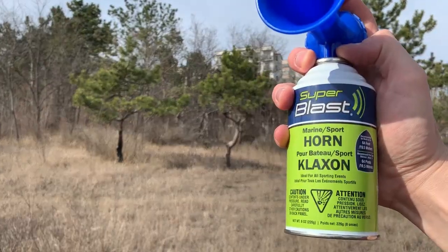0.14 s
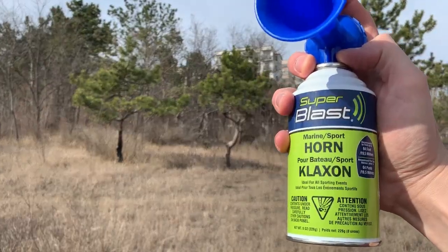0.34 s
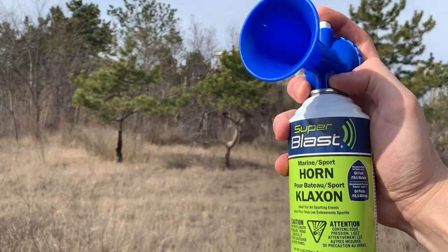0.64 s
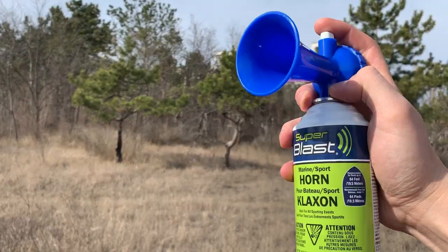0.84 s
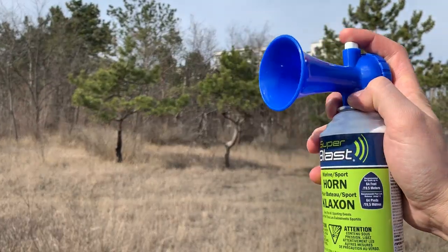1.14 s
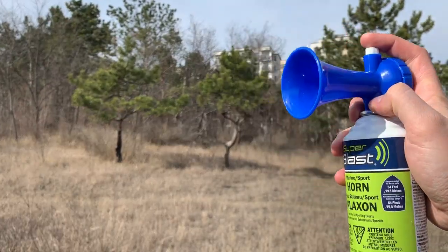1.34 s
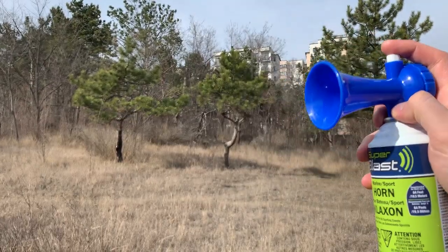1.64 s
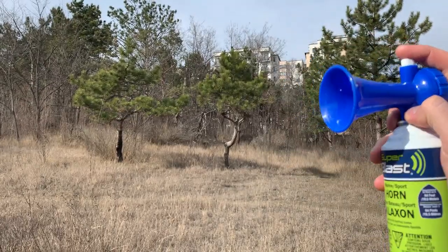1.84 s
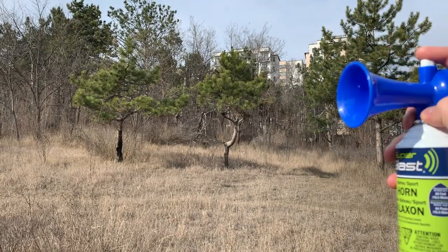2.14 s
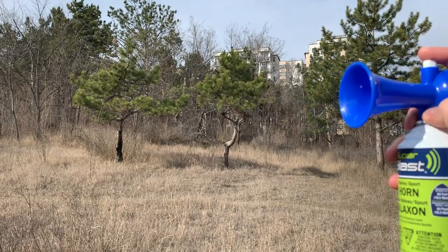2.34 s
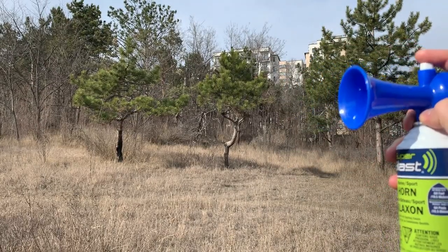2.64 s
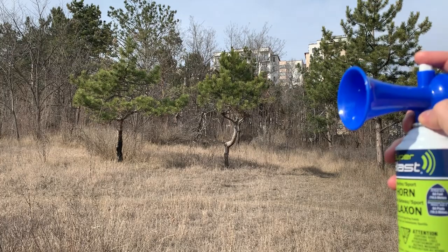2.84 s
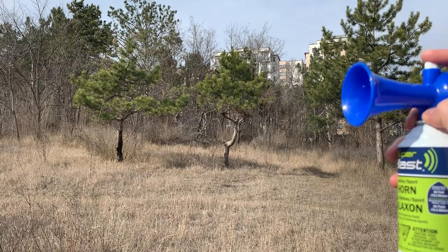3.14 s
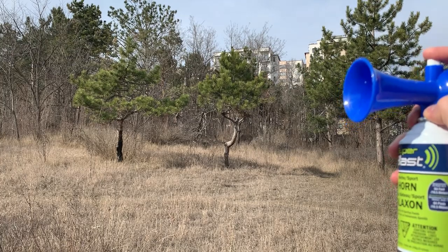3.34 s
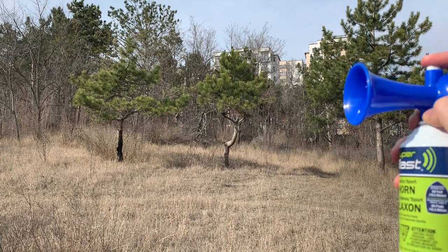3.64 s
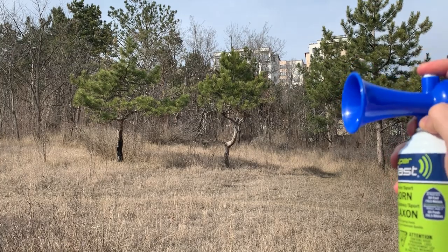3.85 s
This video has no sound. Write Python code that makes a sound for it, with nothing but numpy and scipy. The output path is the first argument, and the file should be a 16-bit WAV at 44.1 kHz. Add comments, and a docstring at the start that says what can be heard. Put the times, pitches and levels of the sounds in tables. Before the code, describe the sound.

Air horn blast, slightly right of the microphone, cut off just after it begins; first a long near-silence outdoors with low town rumble, two faint dog barks and soft air bumps.

```python
"""A hand-held gas horn is set off in a field at the edge of a town.
First far traffic (banded noise) and a wavering engine drone (narrow noise); a distant dog barks twice
(arched harmonics plus rasp) while faint rustles pass and air bumps the microphone (noise bursts).
Near 3.77 s the valve opens with a hiss (noise); the diaphragm (a harmonic sum) starts high and pure,
turns brassy and sinks to its steady note, with faint echoes."""
import sys
import numpy as np
from scipy import signal
from scipy.fft import rfft, irfft
from scipy.io import wavfile

SR = 44100
rng = np.random.default_rng(int(sys.argv[2]) if len(sys.argv) > 2 else 0)


def materialize(psi):
    """Save the field psi as 16-bit PCM at rate SR to the path in sys.argv[1].

    A 1-D psi becomes a single channel; in a 2-D psi each row is a channel.
    """
    bounded = np.clip(np.atleast_2d(psi).T, -1, 1)
    quanta = np.round(bounded * 32767).astype(np.int16)
    wavfile.write(sys.argv[1], SR, quanta)


N = 176400
T = np.arange(N) / SR
OPPOSITE = np.array([[1], [-1]])   # signs of a side signal: left, right


def from_db(db):
    """Amplitude ratio of a level in dB."""
    return 10 ** (np.asarray(db) / 20)


def rms_one(x):
    """Scale to rms 1."""
    return x / np.sqrt(np.mean(x ** 2) + 1e-20)


def along(rows, at):
    """Straight lines between the rows of a table."""
    return np.interp(at, *np.transpose(rows))


def at_hz(points, hz):
    """A spectrum read on a log-frequency axis."""
    f, value = np.transpose(points)
    return np.interp(np.log(np.maximum(hz, 1)), np.log(f), value)


def drift(rate_hz):
    """Noise through a two-pole low-pass, rms 1, computed every 40 samples and interpolated."""
    step, settle = 40, 2000   # samples per point; points discarded
    r = np.exp(-2 * np.pi * rate_hz * step / SR)
    white = rng.standard_normal(N // step + settle + 2)
    slow = rms_one(signal.lfilter([1], [1, -2 * r, r * r], white)[settle:])
    return np.interp(np.arange(N) / step, np.arange(len(slow)), slow)


def coloured(spectrum):
    """One channel of noise with the given colour above 20 Hz; rms 1."""
    hz = np.arange(N // 2 + 1) * SR / N
    gain = from_db(at_hz(spectrum, hz)) * (hz > 20)
    return rms_one(irfft(rfft(rng.standard_normal(N)) * gain, N))


def wide(spectrum, width):
    """Stereo noise: a shared part and a part that is opposite on the two sides."""
    return coloured(spectrum) + width * coloured(spectrum) * OPPOSITE


def bump(centre_s, width_s, db):
    """A Gaussian rise and fall."""
    return from_db(db) * np.exp(-.5 * ((T - centre_s) / width_s) ** 2)


def grow(half_s, rise_s):
    """Exponential growth that saturates at 1 and is half way at half_s."""
    return .5 + .5 * np.tanh((T - half_s) / (2 * rise_s))


def banded_noise(spectrum, patchy_db):
    """Half-octave bands of stereo noise, each with its own level, flicker and likeness; rms 1."""
    # left-right correlation: (frequency [Hz], likeness [-1 to 1])
    likeness = [(30, .5), (70, 0.6), (130, 0.69), (290, 0.57), (450, -0.18), (640, -0.43), (1050, -0.74),
                (1500, -0.43), (2400, .1), (8000, 0.1)]
    out, together = 0, drift(2)
    edges_hz = 22 * 2 ** np.arange(0, 9.6, .5)
    white = rng.standard_normal((2, 2, N))   # neighbouring bands take different noise
    for k, (low, high) in enumerate(zip(edges_hz, edges_hz[1:])):
        band = signal.butter(2, [low, high], "band", fs=SR, output="sos")
        mid, side = signal.sosfilt(np.vstack([band, band]), white[k % 2])
        hz = np.sqrt(low * high)
        alike = np.clip(at_hz(likeness, hz), -1, 1)
        flicker_db = patchy_db * (.5 * together + drift(6.6))
        stereo = np.sqrt(1 + alike) * mid + np.sqrt(1 - alike) * side * OPPOSITE
        out = out + from_db(at_hz(spectrum, hz) + flicker_db) * stereo
    return rms_one(out)


def town():
    """A wash of far traffic, and an engine drone: a carrier modulated by slow noise in quadrature."""
    # traffic colour: (frequency [Hz], level [dB per Hz])
    air = [(20, -33), (32, -17), (49, -2.5), (70, -2.5), (150, -13.5), (210, -15), (290, -15.5), (513, -22),
           (800, -24.5), (1370, -34), (1900, -50.5), (2800, -58.5), (5200, -56.5), (8500, -63),
           (11000, -59), (16000, -64)]
    # the far engine swells and fades: (time [s], level [dB])
    drone_level = [(0, -62), (.45, -60.5), (.85, -64), (1.05, -57), (1.3, -57), (1.6, -64), (2.3, -61),
                   (2.75, -61.5), (3.2, -74), (3.7, -62)]
    air_db, drone_hz, drone_width_hz = -59.5, 66.2, 5.2
    turn = 2 * np.pi * drone_hz * T

    def waver():
        return drift(drone_width_hz) * np.cos(turn) + drift(drone_width_hz) * np.sin(turn)

    drone = from_db(along(drone_level, T)) * (waver() + 0.42 * waver() * OPPOSITE)
    return drone + from_db(air_db) * banded_noise(air, patchy_db=0.95)


def dog():
    """Each bark arches in pitch and level, and scatters back from the trees as decaying noise."""
    # barks: (start [s], length [s], top pitch [Hz], place of the top [0-1 of length], level [dB])
    barks = [(0.258, 0.136, 383, 0.63, -64), (1.97, .13, 359, .74, -66.5)]
    # voice: (harmonic [number], level [dB])
    bark_harmonics = [(1, -17), (2, 2), (3, -20), (4, -10), (5, -29), (6, -37)]
    # rasp colour: (frequency [Hz], level [dB per Hz])
    bark_rasp = [(300, -20), (700, 3), (950, -13), (1350, 2), (1800, -12), (2400, -25), (5000, -60)]
    bend, rough, rasp_db = .6, .02, -15.5   # pitch arch, pitch wobble, rasp level
    trees_t60_s, trees_db = 0.42, -6
    out, rasp = np.zeros(N), from_db(rasp_db) * coloured(bark_rasp)
    for start_s, length_s, top_hz, top_at, db in barks:
        part = np.clip((T - start_s) / length_s, 0, 1)
        pitch_hz = top_hz * (1 - bend * (part - top_at) ** 2) * (1 + rough * drift(100))
        phase = 2 * np.pi * np.cumsum(pitch_hz) / SR
        voice = sum(from_db(level) * np.sin(k * phase) for k, level in bark_harmonics)
        out += from_db(db) * np.abs(np.sin(np.pi * part)) ** 1.14 * (voice + rasp)
    scatter = rng.standard_normal((2, SR)) * from_db(-60 * T[:SR] / trees_t60_s)
    scatter /= np.sqrt(np.sum(scatter ** 2, axis=1, keepdims=True))   # unit energy per side
    return out + from_db(trees_db) * signal.fftconvolve(out[None], scatter, axes=1)[:, :N]


def breeze():
    """Faint rustles and soft low bumps of air on the microphone: noise under Gaussian envelopes."""
    # rustles: (centre [s], width [s], level [dB])
    rustles = [(1.5, 0.23, -91), (2.599, 0.13, -90.5)]
    # rustle colour: (frequency [Hz], level [dB per Hz])
    rustle = [(800, -22), (1600, 1), (2300, -3), (3300, -12), (6000, -28), (16000, -50)]
    # air bumps: (centre [s], width [s], level [dB])
    puffs = [(1.85, 0.042, -55.5), (1.96, 0.013, -47.5), (2.251, 0.024, -52.5), (2.9, 0.053, -59.5),
             (3.55, 0.05, -52), (3.594, 0.0046, -47.5), (3.74, 0.022, -52)]
    # bump colour: (frequency [Hz], level [dB per Hz])
    puff = [(20, -16), (40, 1), (65, 2.5), (100, 2), (170, -23.5), (500, -40), (2000, -61), (8000, -100)]
    rustling = sum(bump(*row) for row in rustles) * wide(rustle, .6)
    return rustling + sum(bump(*row) for row in puffs) * wide(puff, 0.26)


def horn():
    """The diaphragm swings up, gains overtones as it starts to slap its seat, and chops the hissing gas."""
    # spurt colour: (frequency [Hz], level [dB per Hz])
    spurt_colour = [(300, -31), (1000, -8), (2400, 0), (4500, -14), (7000, 3), (9000, -3), (11700, 12),
                    (13500, 6), (16000, -1)]
    # bright jet of gas: (time [s], level [dB])
    hiss_level = [(3.771, -34), (3.776, -37), (3.781, -24), (3.8, -27.5), (3.81, -28), (3.84, -40),
                  (3.88, -39.5), (3.935, -45.5), (3.965, -49), (4.0, -56)]
    # jet colour: (frequency [Hz], level [dB per Hz])
    hiss_colour = [(500, -18.5), (2000, -1.5), (4000, -27), (5800, -16), (7200, 2), (8500, -1),
                   (10000, 2.5), (12000, 2), (14000, 6), (15500, 2)]
    # low noise bursts under the tone's onset: (time [s], level [dB])
    low_burst_level = [(3.771, -49.5), (3.785, -36), (3.812, -27.5), (3.835, -39.5), (3.855, -52.5),
                       (3.875, -44), (3.895, -59), (4.0, -57)]
    # low burst colour: (frequency [Hz], level [dB per Hz])
    low_burst_colour = [(40, -6), (130, -2.5), (350, -4), (800, 1.5), (1400, -2.5), (1850, -6.5),
                        (2400, 4.5), (3300, -7), (4500, -10.5), (6000, -33), (10000, -25)]
    # loudness of the whole tone: (time [s], level [dB])
    blast = [(3.79, 0), (3.805, 0), (3.815, 1.2), (3.83, .3), (3.833, -1.8), (3.872, .3), (3.875, -1.6),
             (3.895, -1.2), (3.915, .3), (4.0, -.3)]
    # base level of the tone's partials: (harmonic [number], peak level [dB])
    harmonics = [(1, -17), (2, -14), (3, -22), (4, -27.5), (5, -33.5), (6, -41.5), (7, -43.5), (8, -46.5),
                 (9, -48.5), (10, -50.5), (11, -48.5), (12, -47.5), (13, -43), (14, -50), (15, -47.5),
                 (16, -51.5), (17, -52), (18, -45.5), (19, -58), (20, -50), (21, -52), (22, -64), (23, -56)]
    # the fundamental starts strong and settles: (time [s], boost [dB])
    fundamental = [(3.8, 13.3), (3.812, 10.8), (3.835, 5.5), (3.872, 4.8), (3.9, 1.5), (3.96, .3)]
    # extra brightness of the first slaps: (frequency [Hz], boost [dB])
    flare_boost = [(1400, 1.5), (2200, 6), (3000, 0.5), (3700, 6), (4400, 15), (5200, 4), (6000, -1.5),
                   (7300, 18), (8500, -0.5), (10000, 0.5), (16000, -7)]
    valve_s, valve_open_s = 3.7685, 0.0039   # start and length of the opening
    spurt_s, spurt_width_s, spurt_db = 3.7713, 0.0021, -29.5   # the valve cracks open
    speak_s, swell_s = 3.7935, 0.0026   # half swing; time constant of growth
    note_hz, sharp_hz, settle_s = 660.5, 213.7, .0275   # steady pitch, excess at speak_s, time constant
    jitter, shimmer_db, flare_s = 0.00089, 3, 0.043
    # overtone k is half grown delay - spread / k after speak_s
    brass_delay_s, brass_spread_s, brass_rise_s = 0.023, 0.022, 0.0042
    # the top harmonics weaken as the can loses pressure; no change at the pivot
    treble_fade_db_per_s, treble_pivot_s = 55, 3.91
    hiss_pulsing, low_burst_pulsing, noise_width = 0.36, 0.26, 0.15

    age_s = np.maximum(T - speak_s, -.014)
    pitch_hz = (note_hz + sharp_hz * np.exp(-age_s / settle_s)) * (1 + jitter * drift(70))
    valve = np.clip((T - valve_s) / valve_open_s, 0, 1)
    phase = 2 * np.pi * np.cumsum(pitch_hz * (valve > 0)) / SR
    swing = grow(speak_s, swell_s)
    flare = np.exp(-(age_s / flare_s) ** 4)
    tone = from_db(harmonics[0][1] + along(fundamental, T)) * swing * np.sin(phase)
    for k, db in harmonics[1:]:
        high = min(k / 10, 1) ** 2   # share of shimmer and fade, full from harmonic 10
        fade_db = treble_fade_db_per_s * (speak_s + age_s - treble_pivot_s)
        level_db = db + high * (shimmer_db * drift(33) - fade_db) + flare * at_hz(flare_boost, k * pitch_hz)
        entry = grow(speak_s + brass_delay_s - brass_spread_s / k, brass_rise_s)
        tone += from_db(level_db) * entry * np.sin(k * phase) * (k * pitch_hz < SR / 2)
    chop = swing * np.cos(phase)
    jet = from_db(along(hiss_level, T)) * wide(hiss_colour, noise_width) * (1 + hiss_pulsing * chop)
    low_bursts = from_db(along(low_burst_level, T)) * wide(low_burst_colour, noise_width)
    low_bursts = low_bursts * (1 + low_burst_pulsing * chop)
    spurt = bump(spurt_s, spurt_width_s, spurt_db) * wide(spurt_colour, noise_width)
    return valve * (from_db(along(blast, T)) * tone + jet + low_bursts) + spurt


def field(x):
    """Faint echoes from the ground and the nearest trees: delayed, panned copies of the left channel."""
    # echoes: (delay [s], level [dB], share to the left [0-1])
    echoes = [(.009, -23.5, 0.8), (.047, -43, 0.7)]
    out = x
    for delay_s, db, left in echoes:
        pan = 2 * np.array([[left], [1 - left]])
        out = out + from_db(db) * np.interp(T - delay_s, T, x[0]) * pan
    return out


def held_right(x):
    """Mostly louder on the right; the treble reaches the left side later, by a phase slope."""
    # left minus right: (frequency [Hz], level difference [dB])
    horn_balance = [(660, -3), (1320, -4.5), (2000, -3), (3300, -6), (4000, -0.5), (4700, -11.5),
                    (5900, -12), (6600, -0.5), (16000, 0.5)]
    treble_lag_s, lag_above_hz = .000204, 6150
    hz = np.arange(N + 1) * SR / (2 * N)
    half_db = at_hz(horn_balance, hz) / 2
    lag = np.exp(-2j * np.pi * treble_lag_s * np.maximum(hz - lag_above_hz, 0))
    sides = np.array([from_db(half_db) * lag, from_db(-half_db)])
    return irfft(rfft(x, 2 * N) * sides)[:, :N]


def scene():
    """The close horn over the quiet field."""
    return town() + dog() + breeze() + held_right(field(horn()))


def record(dry):
    """Peaks clip at full scale, then an elliptic low-pass cuts the top."""
    cutoff_hz = 15750
    low_pass = signal.ellip(14, .1, 80, cutoff_hz, fs=SR, output="sos")
    return signal.sosfilt(low_pass, np.clip(dry, -1, 1))


dry = scene()
out = record(dry)
materialize(out)
```